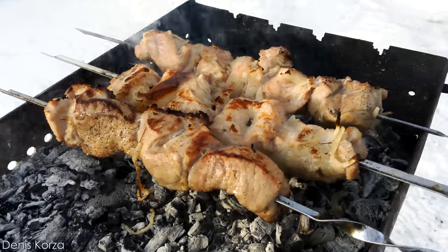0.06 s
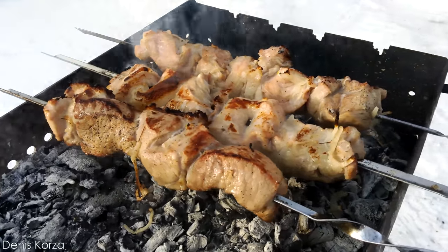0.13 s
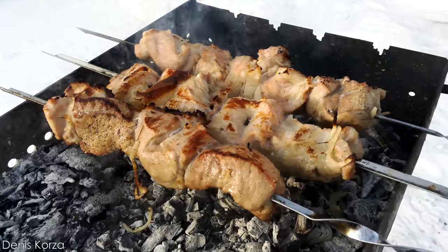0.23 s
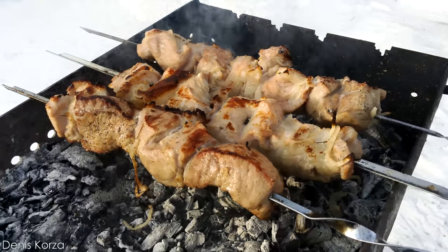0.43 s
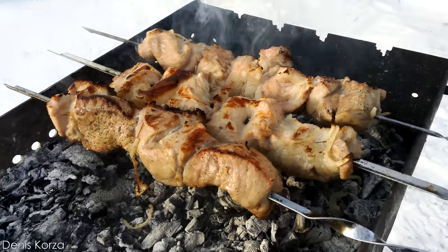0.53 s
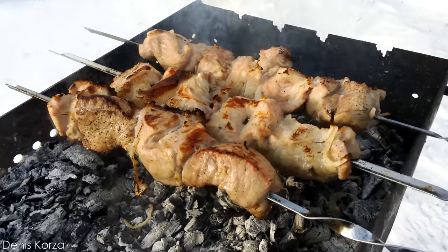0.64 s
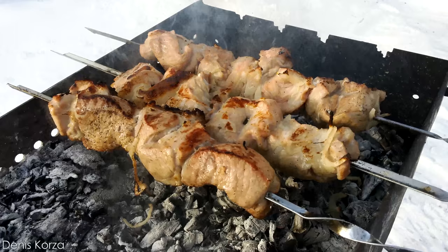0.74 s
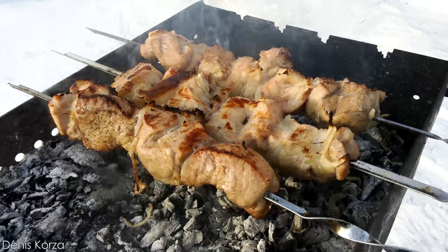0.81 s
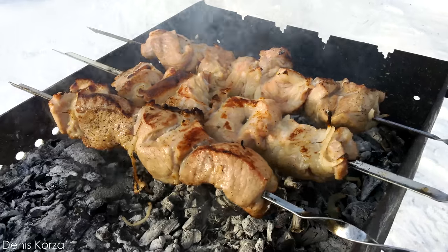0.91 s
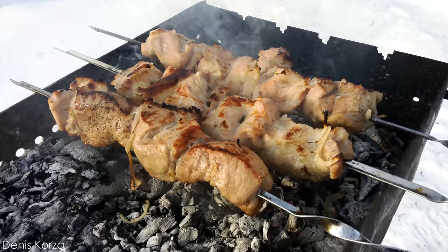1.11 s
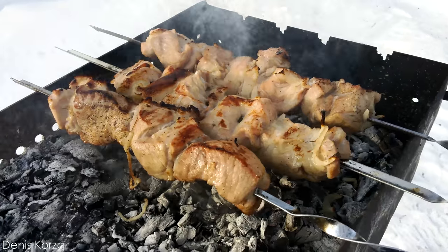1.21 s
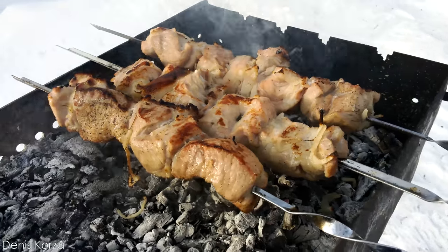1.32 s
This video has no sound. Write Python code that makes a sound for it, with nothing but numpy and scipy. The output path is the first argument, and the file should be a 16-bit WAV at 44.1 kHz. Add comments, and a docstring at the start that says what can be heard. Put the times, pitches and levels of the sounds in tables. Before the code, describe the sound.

Meat sizzles over charcoal throughout, a fine, high, bright crackle heard very close outdoors. Soft hollow knocks at 0.06 and 0.2 s, with a small flare and snaps; a loud ringing spit of fat at 0.38 s. A low wind thump on the left near 0.5 s. Embers crack at 0.89 s, then the longest flare snaps densely until about 1.17 s, easing to steady fry over faint rumble.

```python
"""Fatty meat sizzles over charcoal in an outdoor brazier, heard from close by.
Random tiny bursts, each a short high ping, make a steady fry; drips on the coals make it flare.
Near bubbles snap, one loud spit of fat rings a hollow, embers crack and tick, and soft knocks ring low.
Filtered noise gives light wind, mostly on the left microphone, over a faint outdoor rumble.
Low pulses thump, and one swells under the longest flare."""
import sys
import numpy as np
from scipy import signal
from scipy.fft import rfft, irfft
from scipy.io import wavfile
from scipy.ndimage import uniform_filter1d

SR = 44100
rng = np.random.default_rng(int(sys.argv[2]) if len(sys.argv) > 2 else 0)


def digitize_waveform(pressure):
    """Quantize a signal to 16-bit integers and store it at the path in sys.argv[1].

    Rows of a 2-D input are taken as channels; values are limited to [-1, 1].
    """
    field = np.atleast_2d(pressure).T
    bounded = np.clip(field, -1, 1)
    quanta = np.round(bounded * 32767).astype(np.int16)
    wavfile.write(sys.argv[1], SR, quanta)


N = 59535
T = np.arange(N) / SR

# colour of the frying bubbles and their steam: pitch_hz, relative level_db (per Hz)
FRY = [(100, -32), (400, -27), (900, -30), (1400, -27), (1950, -33), (3000, -26.5), (4000, -23),
       (4700, -18), (5600, -20), (7000, -11), (8000, -5), (9300, 0), (10000, -3), (11000, -9), (12800, -22),
       (15700, -17)]
# colour of the lower body and the dry ticks: pitch_hz, relative level_db (per Hz)
BODY = [(80, -14), (300, -3), (550, -2), (780, -10), (1300, 1), (1950, -13), (2600, -4), (5000, 3),
        (6500, -10), (14000, -30)]

FLICKER_DB = 1.5  # spread of the random drift in sizzle level


def undb(db):
    """Decibels to gain."""
    return 10 ** (np.asarray(db) / 20)


def unit(x):
    """Scale to rms 1."""
    return x / np.sqrt(np.mean(x ** 2))


def pan(x, left_minus_right_db):
    """Place a sound between left and right."""
    return x * undb(np.array([[left_minus_right_db], [-left_minus_right_db]]) / 2)


def ring(x, response):
    """Play x through an impulse response."""
    return signal.fftconvolve(x, response)[:N]


def colour(points, size=1024):
    """Causal (minimum-phase) impulse response of a spectrum, with energy 1."""
    hz, db = np.array(points).T
    bin_hz = np.arange(size // 2 + 1) * SR / size
    level_db = np.interp(np.log(bin_hz + 1), np.log(hz), db)
    # fold the cepstrum so that the response has no sound before time zero
    cepstrum = irfft(np.log(undb(level_db)))
    cepstrum[1:size // 2] *= 2
    cepstrum[size // 2 + 1:] = 0
    response = irfft(np.exp(rfft(cepstrum)))
    return response / np.linalg.norm(response)


def shade(points):
    """A chance variation of a colour, as an impulse response."""
    shade_db = 2.5  # spread at each point
    return colour([(hz, db + shade_db * rng.standard_normal()) for hz, db in points])


def modes(table):
    """Decaying sines, neighbours in opposite sign."""
    t = T[:N // 10]
    out = 0
    for k, (hz, db, t60) in enumerate(table):
        decay = np.exp(-np.log(1000) * t / t60)
        out = out + (-1) ** k * undb(db) * np.sin(2 * np.pi * hz * t) * decay
    return out


def strike(start, table):
    """Set a table of modes ringing at the given moment."""
    return ring(signal.unit_impulse(N, int(start * SR)), modes(table))


def walk(rate_hz):
    """Smooth random drift with spread 1."""
    step = int(SR / rate_hz)
    held = np.repeat(rng.standard_normal(N // step + 1), step)
    return unit(uniform_filter1d(held, step)[:N])


def bursts(rows, column, grain):
    """One fresh grain per row, with the peak level in the given column."""
    out = 0
    for row in rows:
        h = grain()
        moment = signal.unit_impulse(N, int(row[0] * SR))
        out = out + undb(row[column]) * ring(moment, h / np.abs(h).max())
    return out


def air():
    """Faint outdoor rumble, and wind that flutters mostly on the left microphone."""
    # rumble colour: pitch_hz, relative level_db (per Hz)
    rumble_colour = [(20, -32), (40, -7), (62, 0), (110, -12), (250, -19), (500, -18), (1000, -23),
                     (2000, -26), (16000, -36)]
    # wind colour: pitch_hz, relative level_db (per Hz)
    wind_colour = [(20, -14), (70, 0), (200, -3), (500, -15), (1000, -34), (4000, -60)]
    # wind on the left microphone: time_s, level_db
    gusts = [(0, -76), (.15, -64), (.40, -60), (.48, -63), (.5, -47), (.53, -58), (.59, -82), (.95, -78),
             (1.05, -62), (1.16, -67), (1.21, -84)]
    rumble_db, wind_pan_db = -73.3, 16
    shared, left, right = (ring(rng.standard_normal(N), colour(rumble_colour, size=8192)) for _ in range(3))
    rumble = undb(rumble_db) * (shared + undb(-8) * np.array([left, right]))
    wind = ring(rng.standard_normal(N), colour(wind_colour, size=4096))
    flutter = wind * undb(np.interp(T, *np.array(gusts).T))
    # the offset holds the left channel at the gust level
    return rumble + pan(flutter * undb(-wind_pan_db / 2), wind_pan_db)


def thumps():
    """Soft low sine pulses that swell, then die away exponentially."""
    # start_s, rise_s, decay_s (time constant), pitch_hz, level_db (louder side), left_minus_right_db
    pulses = [(.277, .004, .007, 95, -42, 18), (.492, .004, .013, 85, -30.5, 26),
              (.492, .002, .005, 170, -32, 24), (.495, .002, .005, 290, -39, 20),
              (.787, .002, .009, 130, -43, 18), (.883, .006, .025, 55, -50, 0),
              (.929, .025, .016, 59, -37, -2), (.99, .03, .05, 58, -51, 0)]
    out = 0
    for start, rise, decay, hz, db, side_db in pulses:
        age = np.maximum(T - start, 0)
        swell = np.sin(np.pi / 2 * np.minimum(age / rise, 1)) ** 2
        fade = np.exp(-np.maximum(age - rise, 0) / decay)
        pulse = swell * fade * np.sin(2 * np.pi * hz * age)
        out = out + pan(pulse * undb(db - abs(side_db) / 2), side_db)
    return out


def knocks():
    """Drops landing and coals settling ring the same hollow resonances, each at its own pitch."""
    # start_s, peak_db (before the brazier), pitch_ratio
    hits = [(.0595, -38, 1), (.197, -47, .81), (.381, -47, .78)]
    # resonances: pitch_hz (at ratio 1), relative level_db (per Hz)
    hollow = [(100, -24), (290, -10), (395, 1), (480, -5), (600, 0), (770, -27), (950, -15), (1350, -18),
              (1700, -30), (2130, -19), (2700, -44)]
    out = 0
    for start, db, ratio in hits:
        tuned = [(hz * ratio, gain_db) for hz, gain_db in hollow]
        out = out + bursts([(start, db)], 1, lambda: colour(tuned, size=4096))
    return out


def embers(count=4):
    """A crack runs through a coal in a few steps; each step rings it at slightly different pitches."""
    # start_s, length_s, level_db (before the brazier)
    cracks = [(.67, .002, -60), (.792, .008, -61), (.889, .004, -38.5), (.893, .004, -35),
              (.922, .005, -47), (1.325, .003, -62)]
    # ring of a piece of charcoal: pitch_hz (centre), relative level_db, t60_s
    coal_modes = [(540, -12, .024), (1270, -9, .018), (2880, 1, .021), (3130, -4, .02), (3661, -5, .02),
                  (4200, -2, .027), (5150, 1, .015), (6020, -4, .014)]
    detune = .02  # spread as a fraction of pitch
    out = 0
    for start, length, db in cracks:
        for step in range(count):
            tear = np.floor((T - start) / length * count) == step
            detuned = [(hz * (1 + detune * rng.standard_normal()), gain_db, t60)
                       for hz, gain_db, t60 in coal_modes]
            coal = modes(detuned)
            out = out + undb(db) * ring(tear * rng.standard_normal(N), coal / np.linalg.norm(coal))
    return out


def ping():
    """One bubble: a few cycles at its own pitch that swell and fade, over the click of its film; energy 1."""
    centre_hz, spread_octaves, swell_s = 9150, .1, .00029
    film_db = -4  # relative to the tone
    film = shade(FRY)
    age = T[:len(film)]
    swell = (age / swell_s) ** 2 * np.exp(-2 * age / swell_s)
    hz = centre_hz * 2 ** (spread_octaves * rng.standard_normal())
    tone = swell * np.sin(2 * np.pi * hz * age)
    h = tone / np.linalg.norm(tone) + undb(film_db) * film
    return h / np.linalg.norm(h)


def tick():
    """One dry click with a lower body; energy 1."""
    return shade(BODY)


def spit():
    """A drop of fat bursts in quick stages and rings the hollow among the coals."""
    # stages of the burst, before the brazier: start_s, peak_db, body_peak_db
    stages = [(.3811, -18, -26), (.3818, -16.5, -24), (.3845, -10.5, -28)]
    # ring of the hollow: pitch_hz, relative level_db, t60_s
    hollow_modes = [(550, -5, .016), (1170, 2, .014), (1490, 5, .014), (2400, -3, .016), (3260, -4, .02),
                    (3950, -3, .018), (4500, 1, .022), (5080, 4, .022), (5990, -4, .02), (7760, 6, .022),
                    (8910, 4, .022), (9530, 5, .022)]
    ring_db = -33  # gain on all the modes
    burst = bursts(stages, 1, ping) + bursts(stages, 2, tick)
    return burst + undb(ring_db) * strike(stages[0][0], hollow_modes)


def bubbles(level, per_s, spread_db, grain, points, count=20):
    """Random tiny bursts of many pitches, most faint and a few strong, over a thin hiss of steam."""
    size_limit, steam_db = 3.0, -8  # limit in multiples of spread_db; steam relative to the crackle
    size_db = spread_db * np.minimum(rng.exponential(size=N), size_limit)
    size = undb(size_db) * rng.choice([-1, 1], N)
    clicks = unit(size * (rng.random(N) < per_s / SR))
    # share the bursts among a few fresh grains
    kind = rng.integers(count, size=N)
    crackle = sum(ring(level * clicks * (kind == k), grain()) for k in range(count))
    steam = ring(level * rng.standard_normal(N), colour(points))
    return (crackle + undb(steam_db) * steam) / np.hypot(1, undb(steam_db))


def flares(column, grain, points):
    """Each drip flares at once, boils for a while and dies away, sputtering; levels from the given column."""
    # before flicker and brazier: start_s, hold_s, release_s (to -20 dB), level_db, body_level_db
    drips = [(.197, .036, .06, -45.5, -60), (.381, .005, .009, -33, -42), (.39, .055, .12, -46, -59),
             (.485, .048, .025, -46.5, -63), (.79, .012, .03, -46, -64), (.849, .008, .012, -46, -76),
             (.888, .007, .02, -35, -51), (.914, .012, .02, -37, -61), (.93, .115, .175, -39.4, -67),
             (1.125, .045, .022, -46.5, -63)]
    attack_s, per_s, spread_db = .0015, 2000, 4.3
    power = 0
    for row in drips:
        start, hold, release = row[:3]
        age = T - start
        attack = np.clip(age / attack_s, 0, 1)
        level_db = row[column] - 20 * np.maximum(age - hold, 0) / release
        power = power + (attack * undb(level_db)) ** 2
    sputter = undb(FLICKER_DB * walk(300))
    return bubbles(np.sqrt(power) * sputter, per_s, spread_db, grain, points)


def sizzle():
    """The steady fry, the flares with their lower body, the nearest snapping bubbles and dry ticks."""
    # single bubbles that snap close by: start_s, peak_db (before the brazier)
    snaps = [(.0123, -32), (.0724, -31), (.169, -37), (.2016, -25), (.2125, -25), (.2243, -25),
             (.3094, -35), (.4383, -30), (.5301, -30), (.7924, -29), (.8016, -28), (.8547, -25),
             (.9142, -24), (.9205, -25), (.9515, -27), (.9617, -26), (.9686, -27), (.9798, -27),
             (.9894, -26), (.9995, -25), (1.0265, -20.5), (1.0582, -21.5), (1.0669, -23), (1.0726, -26),
             (1.0929, -22), (1.1087, -24), (1.1268, -28), (1.1468, -27), (1.163, -31), (1.3322, -32)]
    # dry ticks of the charcoal: start_s, peak_db (before the brazier)
    coal_ticks = [(.2016, -43), (.2243, -41), (.6711, -36), (.7924, -42), (1.1089, -45), (1.179, -47)]
    fry_db, per_s, spread_db = -54.6, 2600, 4.2
    fry_level = undb(fry_db + FLICKER_DB * walk(45))
    fry = bubbles(fry_level, per_s, spread_db, ping, FRY)
    flaring = flares(-2, ping, FRY) + flares(-1, tick, BODY)
    return fry + flaring + bursts(snaps, 1, ping) + bursts(coal_ticks, 1, tick)


def brazier(x):
    """Short scattered reflections from the steel walls, slightly different left and right."""
    reflections_db, t60_s = -9, .015
    pan_db, side_db = -1.1, -21  # left minus right; gain of the left-right difference
    t = T[:N // 20]
    fade = np.exp(-np.log(1000) * t / t60_s) * (t > .0005)
    mid, side = (ring(x, fade * rng.standard_normal(len(t)) / np.linalg.norm(fade)) for _ in range(2))
    centre = pan(x + undb(reflections_db) * mid, pan_db)
    return centre + undb(side_db) * side * np.array([[1], [-1]])


def scene():
    """Fat and coals in the brazier, with low thumps and the moving air around it."""
    return air() + thumps() + brazier(knocks() + embers() + spit() + sizzle())


def record(dry):
    """The recorder cuts the top of the treble with a steep low-pass."""
    top_hz = 15850
    low_pass = signal.ellip(10, .2, 70, top_hz, fs=SR, output="sos")  # .2 dB ripple, 70 dB rejection
    return signal.sosfilt(low_pass, dry)


dry = scene()
out = record(dry)
digitize_waveform(out)
```